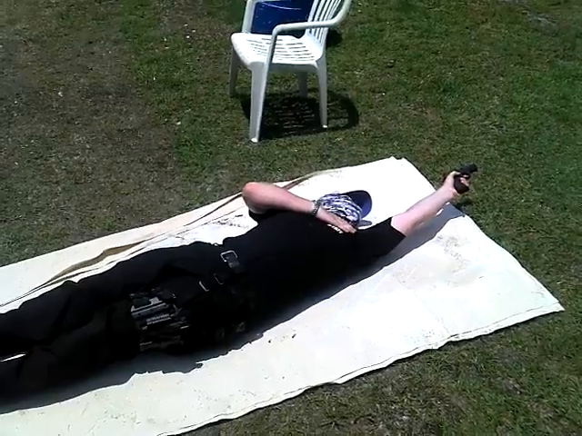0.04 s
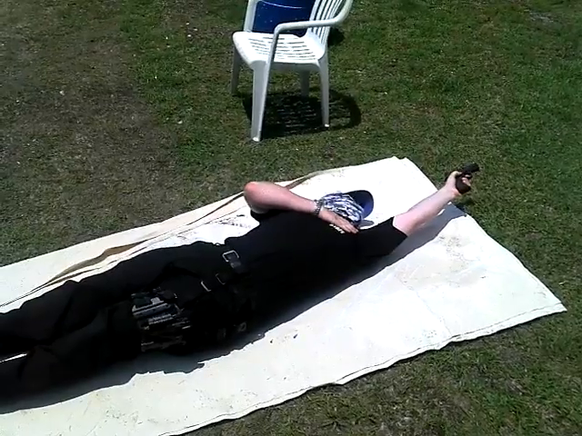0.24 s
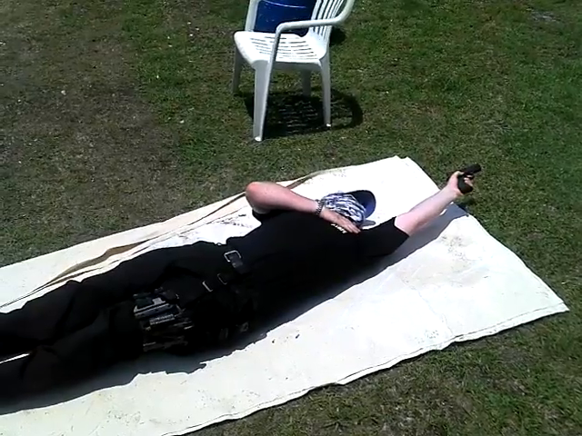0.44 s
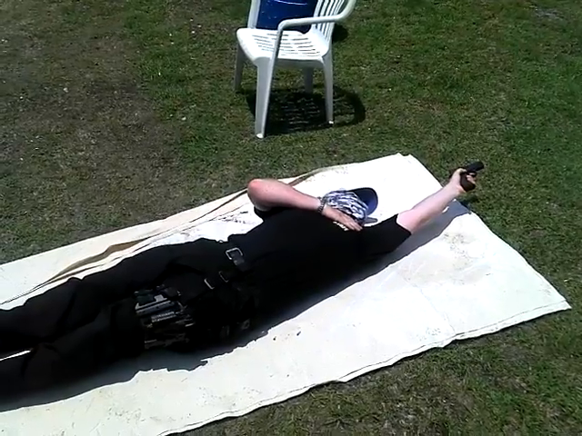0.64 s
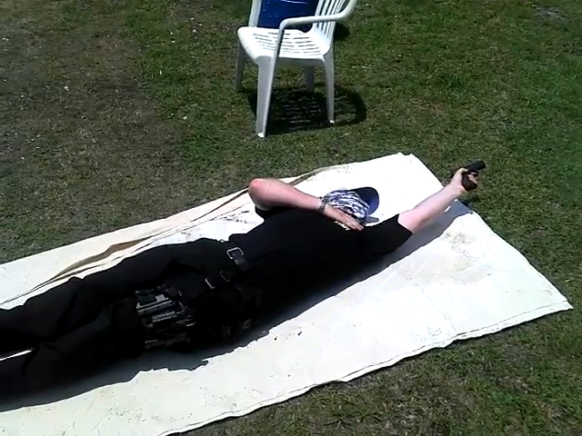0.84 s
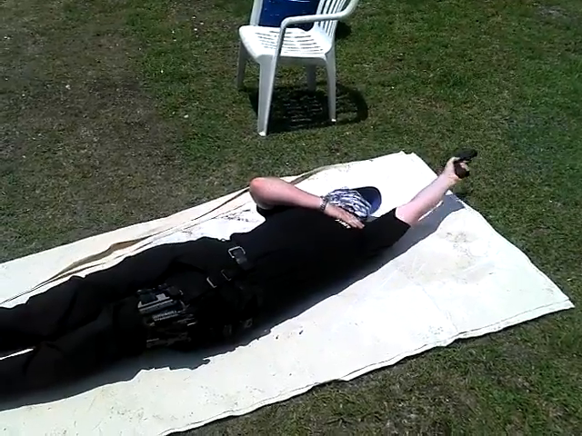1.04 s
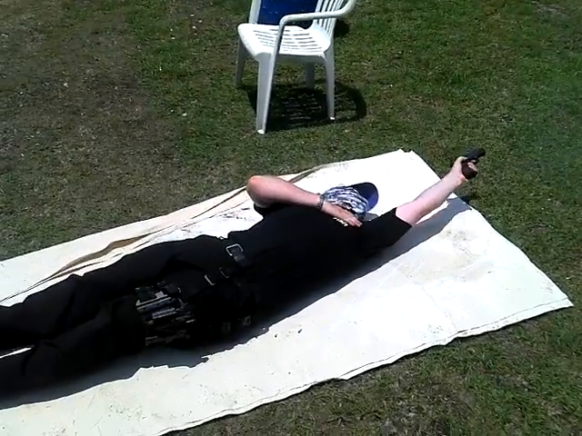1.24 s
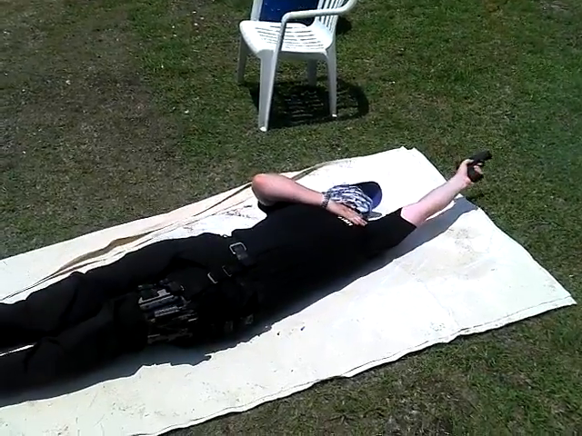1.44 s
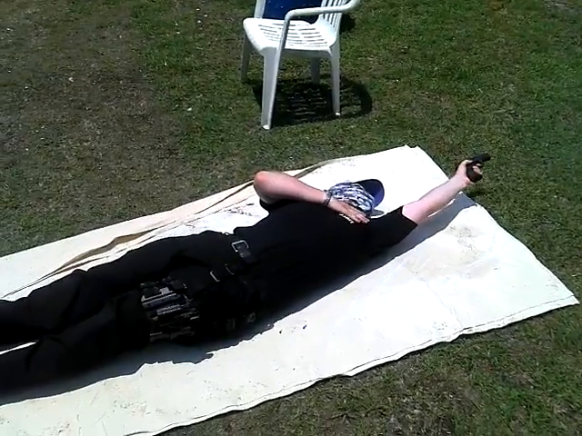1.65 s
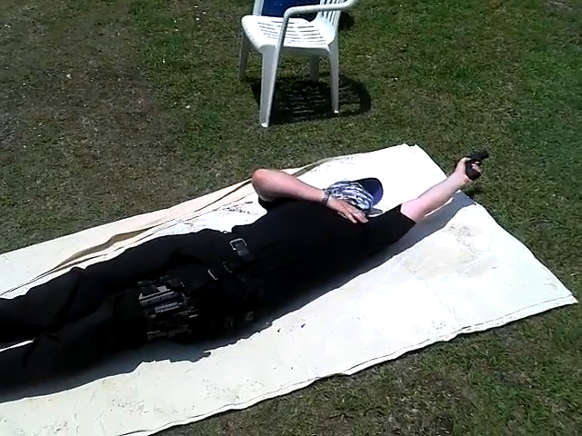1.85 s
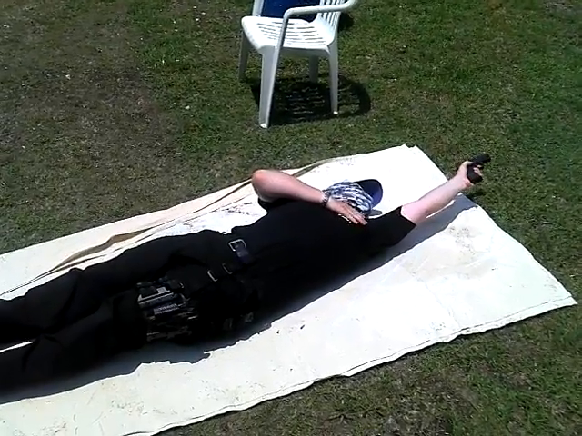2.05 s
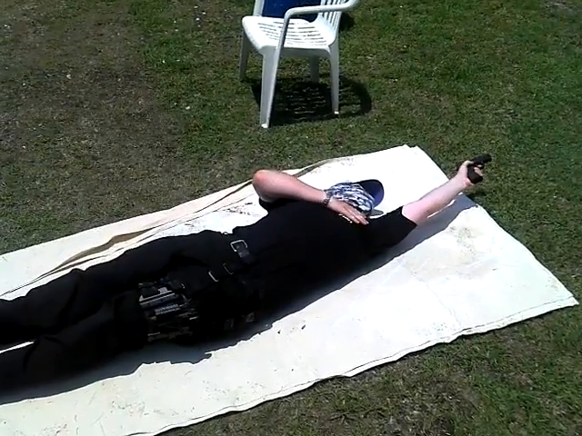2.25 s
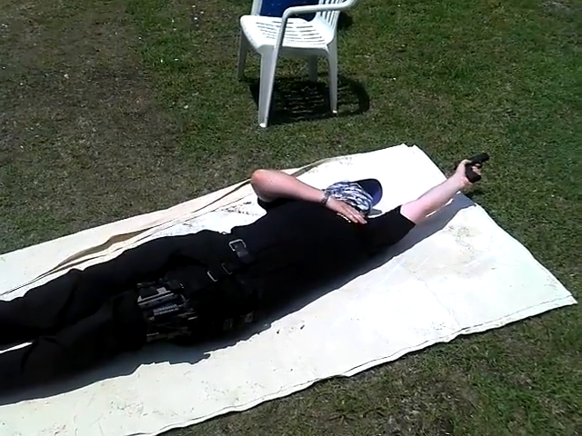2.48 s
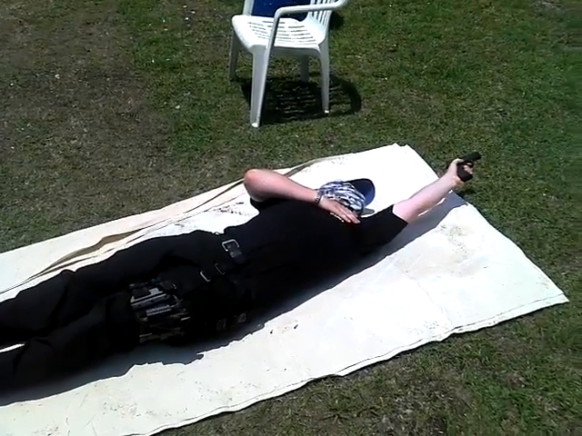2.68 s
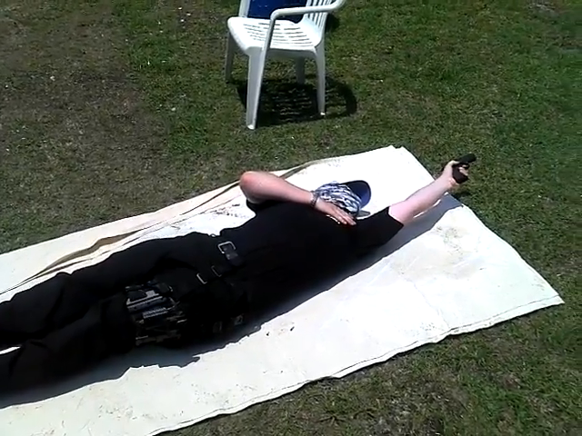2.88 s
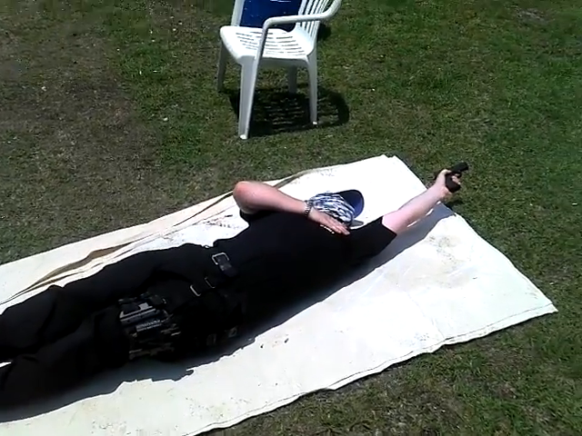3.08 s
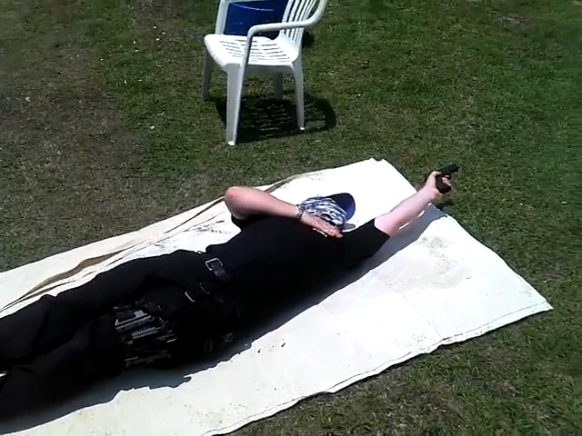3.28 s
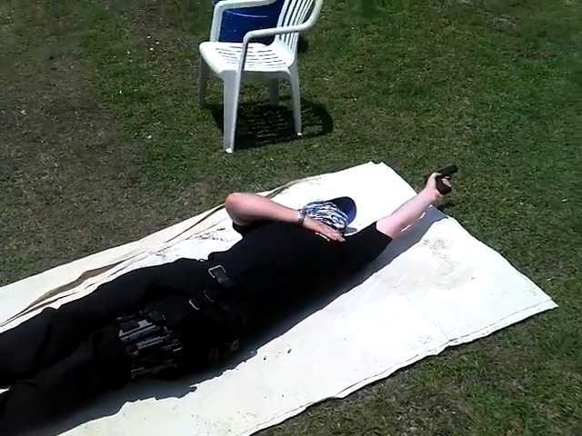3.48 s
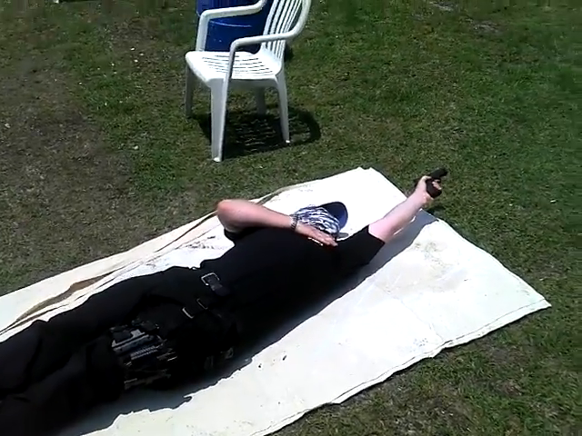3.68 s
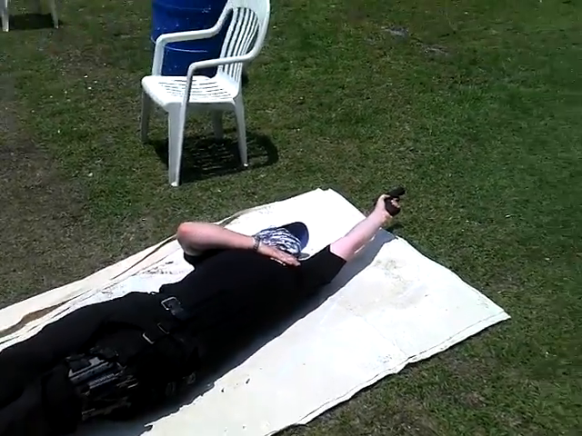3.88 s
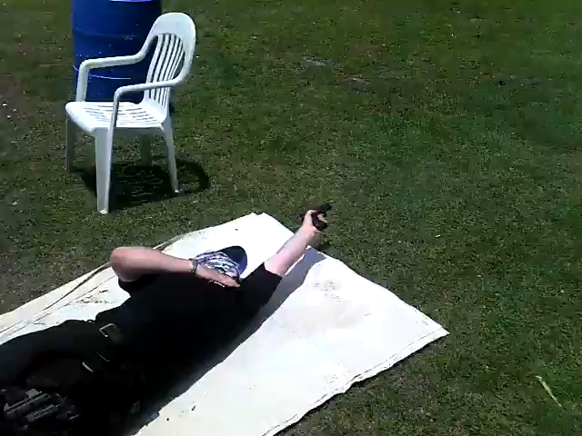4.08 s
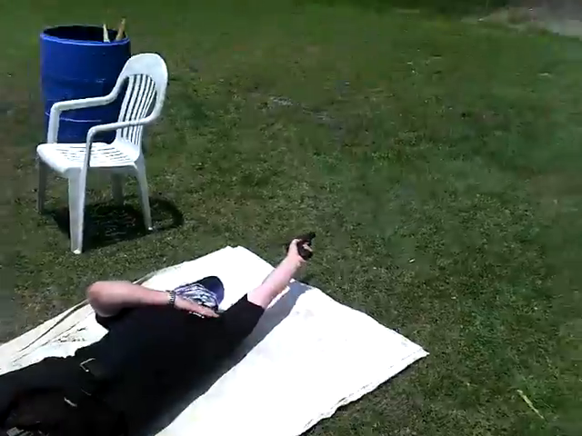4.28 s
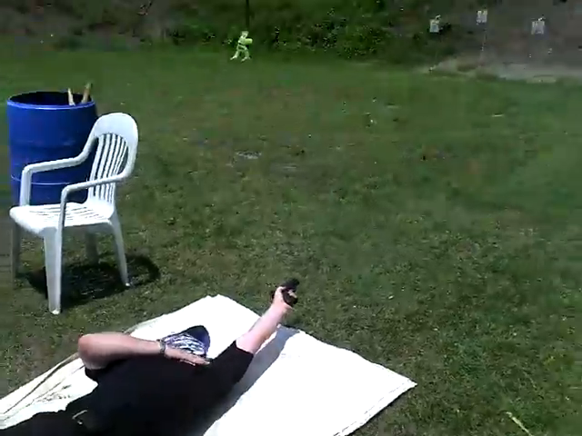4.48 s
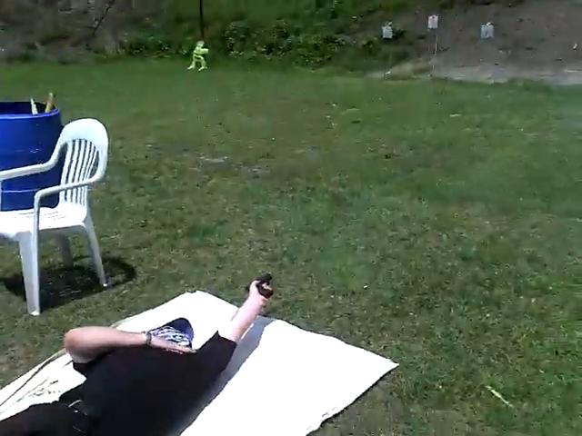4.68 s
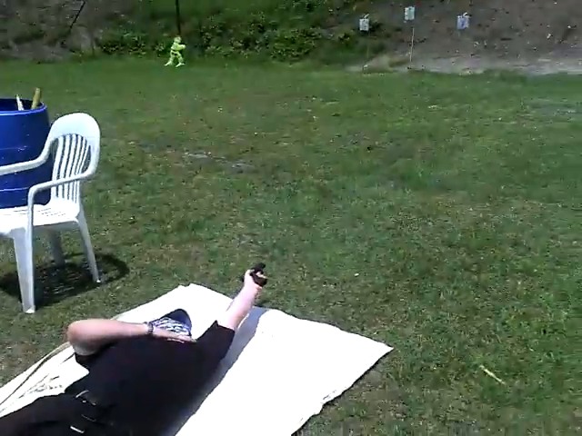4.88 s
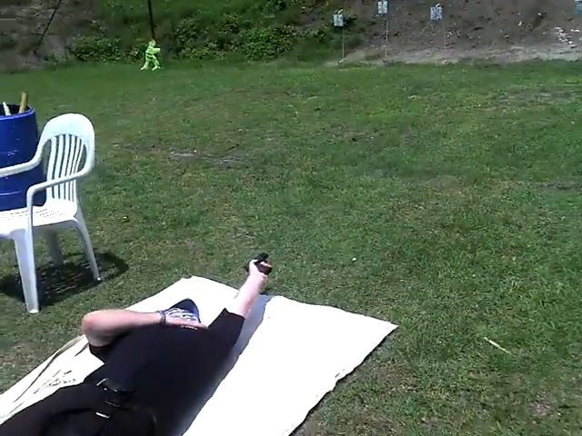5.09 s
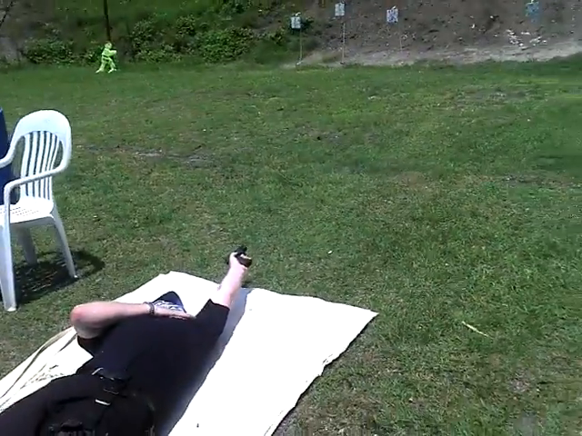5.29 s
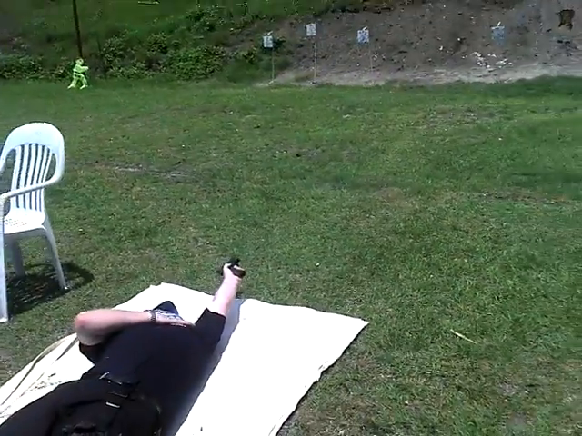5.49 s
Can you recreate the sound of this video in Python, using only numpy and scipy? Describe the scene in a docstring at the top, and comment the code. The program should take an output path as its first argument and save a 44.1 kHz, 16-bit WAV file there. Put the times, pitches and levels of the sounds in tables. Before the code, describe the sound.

An open grassy shooting range heard through a small hand-held microphone, mono and dull at the very top. The first second is only soft hiss and light breeze with low wind bumps and a barely audible clink. At about 1.0 s a near handgun fires, a hard, crackling, overloaded blast. Around 1.1 s the bullet smacks a steel plate, which gives a high bright ding with a thin lingering ring, while echoes roll back from banks and trees. A small bright clink comes at 1.7 s, like a falling cartridge case. As the tail fades, distant falling bird whistles appear near 2.1, 2.8 and 3.5 s, with light handling ticks between 3.0 and 3.8 s. At 3.94 s a farther gun cracks, then at 4.08 s the near gun fires again. The plate rings at 4.15 s, and the echoes die into a stronger leafy breeze until 5.5 s.

```python
"""Handgun and steel plate on a grassy range

A handgun fires twice outdoors, close to a small hand-held microphone that the blasts overload. Each bullet rings
a steel plate (decaying modes); the blast (dying swings and noise bands) rolls back from earth banks and trees.
A farther gun goes off just before the second shot. Around the shots: light wind (filtered noise), a distant
bird (gliding whistles), small ticks of the camera body and clinks of a falling cartridge case (short modes)."""
import sys
import numpy as np
from scipy import signal
from scipy.io import wavfile

SR = 44100
rng = np.random.default_rng(int(sys.argv[2]) if len(sys.argv) > 2 else 0)


def dump(signal):
    """Clip the signal to [-1, 1] and save it as 16-bit WAV at the path in sys.argv[1]."""
    limited = np.clip(np.atleast_2d(signal).T, -1, 1)
    pcm = np.round(limited * 32767).astype(np.int16)
    wavfile.write(sys.argv[1], SR, pcm)


def elevation(decibels):
    """Turn decibel levels (scalar or array-like) into linear amplitude ratios."""
    levels = np.asarray(decibels, float)
    return 10 ** (levels / 20)


N = 243873  # length in samples


def at_hz(points, hz):
    """Reads a table whose first column is frequency, on a log frequency axis."""
    table = np.array(points)
    return np.interp(np.log(hz), np.log(table[:, 0]), table[:, 1])


def rms_one(x):
    """Scales a signal to rms 1."""
    return x / np.sqrt(np.mean(x ** 2) + 1e-20)


def band_pass(x, order, low_hz, high_hz):
    """Keeps one range of frequencies."""
    return signal.sosfilt(signal.butter(order, [low_hz, high_hz], "band", fs=SR, output="sos"), x)


def drift(corner_hz):
    """Slow random curve of rms 1: noise through two equal low-pass poles, at a twentieth of the sample rate."""
    r = np.exp(-2 * np.pi * corner_hz / (SR / 20))
    noise = rng.standard_normal(N // 20 + 2002)
    slow = signal.lfilter([1], [1, -2 * r, r * r], noise)[2000:]  # drop the settling part
    return np.interp(np.arange(N) / 20, np.arange(len(slow)), rms_one(slow))


def ring_of(x, hz, t60):
    """One mode driven by x; a unit click gives a dying sine that starts from height 1."""
    r, w = elevation(-60 / (t60 * SR)), 2 * np.pi * hz / SR
    return signal.lfilter([0, np.sin(w)], [1, -2 * r * np.cos(w), r * r], x)


def ring(start_s, hz, level_db, t60):
    """Blows at the given times set a mode ringing."""
    clicks = np.full(N, 1e-18)  # inaudible floor keeps the filter out of denormals
    clicks[np.round(np.array(start_s) * SR).astype(int)] = elevation(np.array(level_db))
    return ring_of(clicks, hz, t60)


def bands(colour, flicker_db):
    """Third-octave noise bands and their centres; rms 1 in sum, flickering both together and each alone."""
    edges = 40 * 2 ** (np.arange(25) / 3)
    centres = np.sqrt(edges[1:] * edges[:-1])
    white = rng.standard_normal((2, N))  # neighbouring bands use different noise
    together = drift(40)
    out = []
    for k, centre in enumerate(centres):
        band = band_pass(white[k % 2], 2, edges[k], edges[k + 1])
        flicker = flicker_db * (together + drift(20))
        out.append(band * elevation(at_hz(colour, centre) + flicker))
    return centres, np.array(out) / np.std(np.sum(out, axis=0))


def scatter(x, delay_s, t60):
    """Diffuse return: a swelling, dying cloud of reflections, one second long, of energy 1."""
    t = np.arange(SR) / SR
    swell = 1 - np.exp(-(t / delay_s) ** 4)
    cloud = rng.standard_normal(SR) * swell * elevation(-60 * t / t60)
    return signal.fftconvolve(x, cloud / np.linalg.norm(cloud))[:N]


# Spectrum of the open air hiss, relative: pitch_hz [Hz], level_db [dB per Hz]
AIR_COLOUR = [(24, -39), (40, -9.5), (129, -8), (253, -4.5), (569, -6.5), (651, -13), (1120, -13.5),
              (1500, -8.5), (2200, -11.5), (4000, -11.5), (5200, -19.5), (7200, -18), (9000, -50),
              (11200, -69), (19000, -120)]
# Breeze in grass and leaves: start_s [s], level_db [dB above calm, before each sound's share]
BREEZE = [(0.0, 3), (1.0, -1), (2.9, 0.13), (3.4, 3.5), (3.7, 7), (3.92, 11), (4.9, 4), (5.2, 8),
          (5.3, 10.5), (5.53, 11.5)]
# How far the hiss follows the breeze: pitch_hz [Hz], share [of the breeze's dB]
HISS_FOLLOWS = [(150, 0.7), (1500, .75), (4300, 1.15), (6800, .4)]
# Gusts on the microphone: peak_s [s], level_db [dB]
GUSTS = [(.592, -61), (.772, -58.5), (.94, -61), (3.135, -71), (4.78, -67), (5.122, -68), (5.39, -68)]


def air():
    """Hiss and a soft middle rush follow the breeze; lumpy wind and bell-shaped gusts share a bass band."""
    hiss_db, rush_db, rush_share, rush_lumps_db = -69.5, -79, 1.3, 1.5
    wind_db, wind_lumps_db, gust_half_width_s = -81.5, 3.5, .035
    t = np.arange(N) / SR
    breeze_s, breeze_level = np.transpose(BREEZE)
    breeze_db = np.interp(t, breeze_s, breeze_level)

    centres, noise = bands(AIR_COLOUR, flicker_db=.3)
    hiss_gains = elevation(hiss_db + np.outer(at_hz(HISS_FOLLOWS, centres), breeze_db))
    hiss = np.sum(hiss_gains * noise, axis=0)

    white = rng.standard_normal((2, N))
    rush = rms_one(band_pass(white[0], 2, 650, 1150))
    rush_gain = elevation(rush_db + rush_share * breeze_db + rush_lumps_db * drift(10))

    wind = rms_one(band_pass(white[1], 2, 70, 190))
    gusts = sum(elevation(db) * np.exp(-.5 * ((t - s) / gust_half_width_s) ** 2) for s, db in GUSTS)
    wind_gain = elevation(wind_db + wind_lumps_db * drift(6)) + gusts
    return hiss + rush_gain * rush + wind_gain * wind


# Distant bird notes: start_s [s], pitch_hz [Hz at the start], length_s [s], level_db [dB], fall_hz [Hz]
BIRD = [(2.11, 2745, .2, -71, 30), (2.812, 3165, .06, -69.5, 60.33), (2.83, 3545, .14, -68.5, 54.6),
        (2.882, 2755, .25, -70, 36), (3.506, 3080, .07, -67, 53.9), (3.526, 3490, .1, -67, 44),
        (3.607, 2720, 0.13, -68, 27.9)]


def bird():
    """Short falling whistles whose pitch wavers at random, drawn out by the trees."""
    out = np.zeros(N)
    waver_hz = 22 * drift(40)
    for start_s, pitch_hz, length_s, level_db, fall_hz in BIRD:
        at, t = int(start_s * SR), np.arange(int(length_s * SR)) / SR
        note = slice(at, at + len(t))
        hz = pitch_hz - fall_hz * np.sqrt(t / length_s) + waver_hz[note]
        swell = np.sqrt(np.sin(np.pi * t / length_s))
        out[note] += elevation(level_db) * swell * np.sin(2 * np.pi * np.cumsum(hz) / SR)
    return out + elevation(-2) * scatter(out, .012, .6)


# Ticks of the camera body: start_s [s], level_db [dB at 1 kHz], brightness [dB per octave]
TICKS = [(2.977, -35, -1.5), (3.013, -52, -5), (3.1086, -38.5, -1.5), (3.1379, -37.5, -3),
         (3.15, -44, -1.5), (3.410, -36, 2), (3.539, -43.5, 1), (3.679, -42.5, 6), (3.7966, -44.5, 2)]
# Modes of the camera body: pitch_hz [Hz], level_db [dB, added to the tick's], t60 [s]
BODY = [(426, -6, 0.021), (1020, -33, 0.023), (1740, -3, 0.012), (2220, -7, 0.0045), (2990, -8, 0.0059),
        (3220, -10, 0.0026)]


def camera_ticks():
    """Light contacts in the hand strike short modes of the camera body, each with its own random strength."""
    start_s, level_db, brightness = np.transpose(TICKS)
    chance_db = rng.normal(0, 1, (len(start_s), len(BODY)))
    ticks = np.zeros(N)
    for k, (pitch_hz, mode_db, t60) in enumerate(BODY):
        tilt_db = brightness * np.log2(pitch_hz / 1000)
        ticks += ring(start_s, pitch_hz, level_db + mode_db + tilt_db + chance_db[:, k], t60)
    return band_pass(ticks, 3, 250, 4000)  # soft contact


# Small bright clinks: start_s [s], pitch_hz [Hz], level_db [dB], t60 [s]
CLINKS = [(.612, 3450, -52, .02), (.612, 4200, -56, .015), (1.721, 4760, -29, .012),
          (1.721, 4100, -40, .006), (1.721, 7010, -53, .35), (2.423, 6300, -60, .004),
          (2.47, 6300, -59, .004), (3.195, 6400, -59, .004), (3.365, 6300, -60, .004)]


def clinks():
    """Single high modes, as of a cartridge case falling."""
    return sum(ring([start_s], hz, [db], t60) for start_s, hz, db, t60 in CLINKS)


# Thin late steel ring, one start after each strike: start_s [s]
LATE_S = [1.305, 4.345]
# Its modes: pitch_hz [Hz]
LATE_HZ = [1146, 2850, 3193, 3557, 5960, 6748]
# Their decays: t60 [s]
LATE_T60 = [2.2, 1.5, 1.1, 1.0, .5, .55]
# Their strengths: first_db [dB], second_db [dB]
LATE = [(-38.5, -38.5), (-48, -44.5), (-36.5, -48), (-46, -50.5), (-37, -39), (-52, -45.5)]


def late_ring():
    """A few longer modes, perhaps a neighbouring plate; a little scatter makes them waver."""
    rings = sum(ring(LATE_S, hz, strengths_db, t60) for hz, t60, strengths_db in zip(LATE_HZ, LATE_T60, LATE))
    return rings + elevation(-17) * scatter(rings, .04, .4)


# Bullet strikes on the plate: start_s [s]
STRIKES_S = [1.097, 4.149]
# Modes of the plate: pitch_hz [Hz]
PLATE_HZ = [1616, 2143, 2807, 2842, 2960, 3185, 3210, 3555, 4768, 5324, 5556, 6748, 7300]
# Their decays: t60 [s]
PLATE_T60 = [.42, .1, .15, .4, .18, .33, .2, .33, .2, .2, .15, .1, .08]
# Their blows: build_up [s, t60 of the part missing at first], first_db [dB], second_db [dB]
PLATE = [(.04, -8.5, -7.5), (.01, -31, -18), (.02, -26.5, -12), (0.1, -3, 4.5), (0.016, -22, -9),
         (0.012, -2.5, -4), (.02, -17, -22.5), (0.081, -1, -2), (0.0043, -21, -4), (0.044, -6, -17.5),
         (.008, -14.5, -7.5), (0.0063, -12.5, -5.5), (.01, -23, -14)]
# Returns of the ring from single banks: delay_s [s], level_db [dB]
PLATE_RETURNS = [(.14, -21.0), (.195, -27.0), (.3, -39.0)]


def plate():
    """Each mode builds up as the blow spreads, then dies; banks and trees return the ring."""
    rings = np.zeros(N)
    for hz, t60, (build_up, *strengths_db) in zip(PLATE_HZ, PLATE_T60, PLATE):
        missing = ring(STRIKES_S, hz, strengths_db, min(build_up, .7 * t60))
        rings += ring(STRIKES_S, hz, strengths_db, t60) - missing

    # the plate swings away from the listener soon after a strike and its direct ring drops
    swing_after_s, swing_takes_s, swing_db = .055, .012, np.array([-2, -5])  # drop after each strike
    t = np.arange(N) / SR
    last = np.maximum(np.searchsorted(STRIKES_S, t) - 1, 0)
    since = t - np.array(STRIKES_S)[last]
    swing = np.clip((since - swing_after_s) / swing_takes_s, 0, 1)
    direct = elevation(swing_db[last] * swing) * rings

    out = direct + elevation(-29.5) * scatter(rings, .15, .88)  # the trees
    for delay_s, level_db in PLATE_RETURNS:
        lag = round(delay_s * SR)
        out[lag:] += elevation(level_db) * scatter(rings, .004, .04)[:-lag]
    return out


# Smack of the bullet, just ahead of the ring: lead_s [s], pitch_hz [Hz], level_db [dB], t60 [s]
SMACK = [(.0075, 800.5, 1, 0.0088), (.0045, 350.5, 1.5, 0.013)]


def bullet_smack():
    """Short dying swings just before each strike rings."""
    return sum(ring(np.array(STRIKES_S) - lead_s, hz, db, t60) for lead_s, hz, db, t60 in SMACK)


# Waves of the farther gun and two single slaps from banks: start_s [s], pitch_hz [Hz], level_db [dB], t60 [s]
LONE_THUMPS = [(1.135, 197.7, -7, 0.015), (3.943, 1593, -1.5, 0.003), (3.9448, 196.4, -2.5, 0.048),
               (3.983, 3406, -4.5, 0.0053), (4.1137, 387, -1, 0.01)]


def lone_thumps():
    """Pressure waves heard once: a steep front and a few dying swings."""
    return sum(ring([start_s], hz, [db], t60) for start_s, hz, db, t60 in LONE_THUMPS)


# The near handgun fires, for its thumps and its roll: start_s [s], level_db [dB]
SHOTS = [(1.027, 0.0), (4.075, 0)]
# Waves after each shot, from muzzle and ground: delay_s [s], pitch_hz [Hz], level_db [dB], t60 [s]
THUMPS = [(.006, 357.6, 2.5, .009), (.009, 109.2, -5.0, .05), (0.0131, 200.3, 3.5, .018)]


def muzzle_thumps():
    """Each shot's pressure waves: a steep front followed by a few dying swings."""
    shot_s, shot_db = np.transpose(SHOTS)
    return sum(ring(shot_s + delay_s, hz, shot_db + db, t60) for delay_s, hz, db, t60 in THUMPS)


def rolling(returns, centres, spread):
    """Power of each band after one report: returns swell in over a share of their delay, die and add up."""
    octaves = np.log2(centres / 3000)[:, None]
    bass = np.clip(-octaves / 2, 0, 1)  # full from 750 Hz down
    treble = np.clip(octaves, 0, 1)  # full from 6 kHz up
    t, power = np.arange(2 * SR) / SR, 0
    for delay_s, level_db, t60, bass_db, treble_db in returns:
        since = np.maximum(t - delay_s, 0)
        swell = 1 - np.exp(-since / (spread * delay_s + 1e-4))
        band_db = level_db + bass * bass_db + treble * treble_db
        power = power + (swell * elevation(band_db - 60 * since / t60)) ** 2
    return power


# Pace of decay over pitch: pitch_hz [Hz], share [factor on a return's t60]
DIES_FASTER = [(100, .5), (400, .95), (3000, 1.11), (7000, .85)]


def paced(returns, centres):
    """Gives bass, middle and treble of every return their own decay time."""
    share = at_hz(DIES_FASTER, centres)[:, None]
    return [(delay_s, db, t60 * share, *tone) for delay_s, db, t60, *tone in returns]


# Farther gun: crack, ground wash and the roll swelling behind it
# delay_s [s], level_db [dB], t60 [s, before its share], bass_db [dB added], treble_db [dB added]
FAR_RETURNS = [(0, -3.5, .045, 3.5, -6), (0, -28.5, .4, 3, -5), (.038, -10.5, 0.81, -10.5, -7.5)]


def far_report(centres):
    """Band powers of the farther gun, whose roll swells in gradually."""
    return rolling(paced(FAR_RETURNS, centres), centres, spread=.74)


# Near gun: blast, near bank, second bank, far tree line
# delay_s [s], level_db [dB], t60 [s, before its share], bass_db [dB added], treble_db [dB added]
RETURNS = [(0, 2.5, .3, -3.5, -2.5), (.066, -7, .55, 1.5, 1), (.17, -15, .45, -9.5, -14.5),
           (.28, -32, .3, -8, -6), (.41, -29, 0.71, -16, -9.5)]
# Decay of the long wash from the whole range: pitch_hz [Hz], t60 [s]
TAIL_T60 = [(140, 1.5), (350, 1.646), (1000, 1.45), (3500, 1.6), (7000, 1.2)]


def near_report(centres):
    """Band powers of the near gun: the same returns after every shot, over one long wash."""
    tail = (.0021, -24.5, at_hz(TAIL_T60, centres)[:, None], 5, -7)  # columns as in RETURNS
    return rolling(paced(RETURNS, centres) + [tail], centres, spread=.06)


# Spectrum of the blast and its echoes, relative: pitch_hz [Hz], level_db [dB per Hz]
ROLL_COLOUR = [(24, -49), (40, -32), (216, -14), (475, -8.5), (556, -7), (762, -12), (933, -12.5),
               (1090, -6), (1190, -9.5), (2450, -11.5), (3290, -1), (7560, -20), (8650, -32.5),
               (11200, -71), (19000, -120)]


def echo_roll():
    """Reports roll on as dense echoes, noise bands under dying gains; loud noise makes the capsule ring."""
    far_shot_s, crackle_db, crackle_hz = 3.941, 2.5, 120
    capsule_hz, capsule_width_hz, capsule_db = 3387, 260, -4.5  # width at -6 dB
    loud_from_db, loud_span_db = -16.5, 18.5  # ringing and crackle grow over this span
    centres, noise = bands(ROLL_COLOUR, flicker_db=1.22)

    near = near_report(centres)
    reports = [(start_s, elevation(2 * db) * near) for start_s, db in SHOTS]  # 2 * db: power
    reports.append((far_shot_s, far_report(centres)))
    power = np.full((len(centres), N + 2 * SR), 1e-18)
    for start_s, roll in reports:
        at = round(start_s * SR)
        power[:, at:at + 2 * SR] += roll
    gains = np.sqrt(power[:, :N])

    drive = gains[np.argmin(np.abs(centres - capsule_hz))]  # the band nearest the capsule's pitch
    loud = np.clip((20 * np.log10(drive) - loud_from_db) / loud_span_db, 0, 1)
    capsule = rms_one(ring_of(rng.standard_normal(N), capsule_hz, 3.8 / capsule_width_hz))
    echoes = np.sum(gains * noise, axis=0) + elevation(capsule_db) * drive * loud * capsule
    crackle = elevation(crackle_db * np.sqrt(loud) * drift(crackle_hz))  # loud echoes come in uneven bursts
    return echoes * crackle


def scene():
    """All sources at the microphone, one channel."""
    guns = echo_roll() + muzzle_thumps() + lone_thumps()
    steel = bullet_smack() + plate() + late_ring()
    background = camera_ticks() + clinks() + bird() + air()
    return (guns + steel + background)[None]


def top_cut(x):
    """Nothing passes above the cut-off."""
    return signal.sosfilt(signal.butter(12, 8800, fs=SR, output="sos"), x)


def record(dry):
    """Sound is dulled above dull_above_hz, then overloads: clipped blasts add bright sound back; ends are cut."""
    dull_above_hz, clip_level, knee = 6850, .74, 6  # a higher knee bends more sharply
    dulled = signal.sosfilt(signal.ellip(5, 1, 45, dull_above_hz, fs=SR, output="sos"), dry)
    overloaded = dulled / (1 + np.abs(dulled / clip_level) ** knee) ** (1 / knee)
    no_bass = signal.sosfilt(signal.butter(4, 85, "high", fs=SR, output="sos"), overloaded)
    no_top = signal.sosfilt(signal.cheby2(12, 60, 9100, fs=SR, output="sos"), no_bass)  # 60 dB down at 9100 Hz
    finished = np.clip(no_top, -1, 1)
    return top_cut(finished)


dry = scene()
out = record(dry)
dump(out)
```